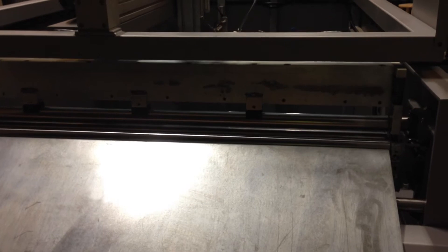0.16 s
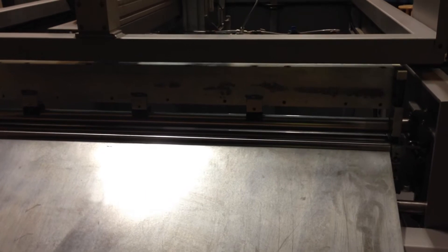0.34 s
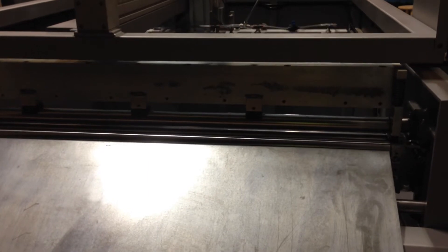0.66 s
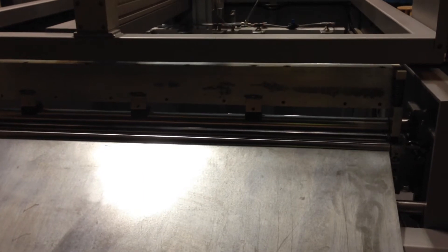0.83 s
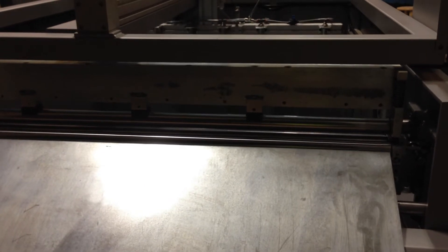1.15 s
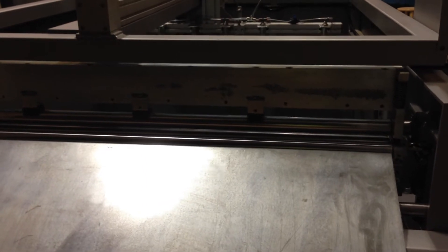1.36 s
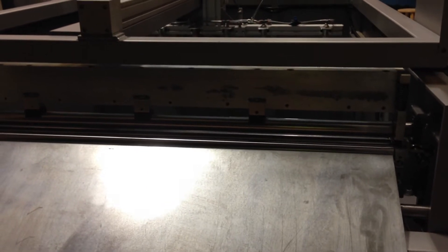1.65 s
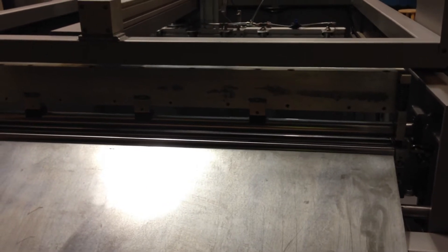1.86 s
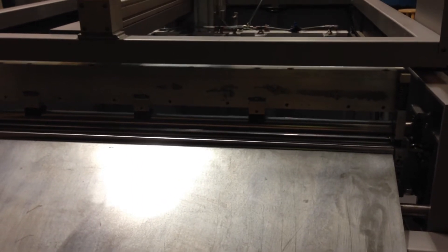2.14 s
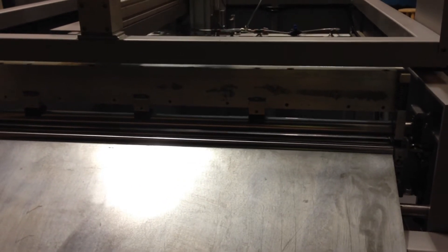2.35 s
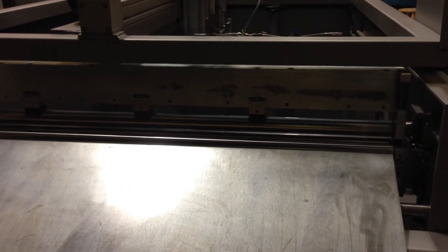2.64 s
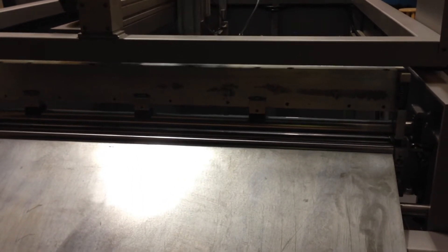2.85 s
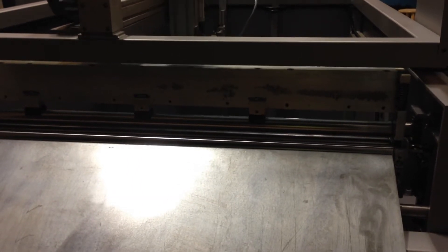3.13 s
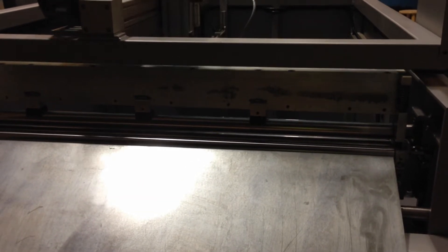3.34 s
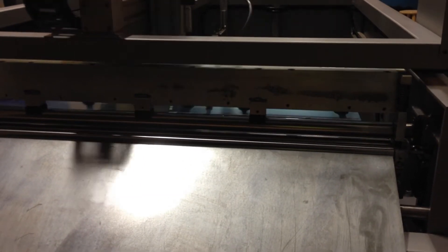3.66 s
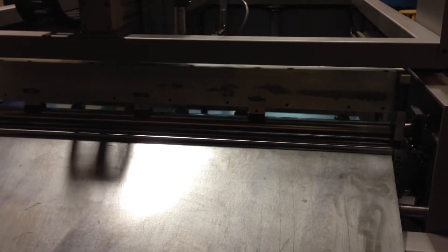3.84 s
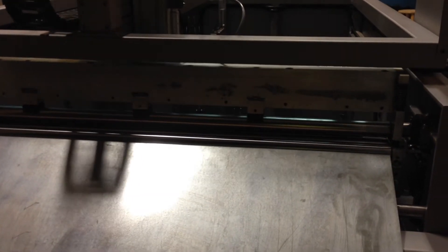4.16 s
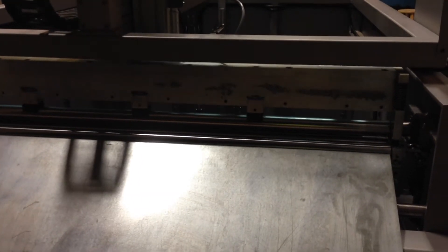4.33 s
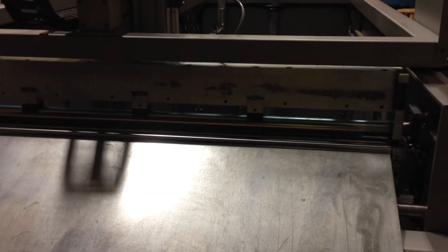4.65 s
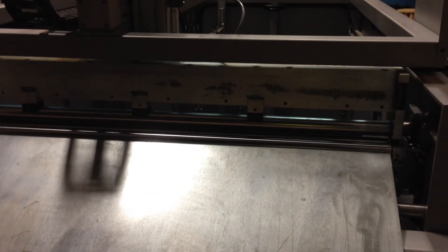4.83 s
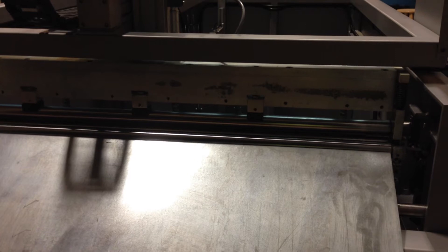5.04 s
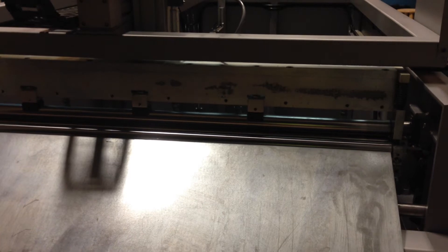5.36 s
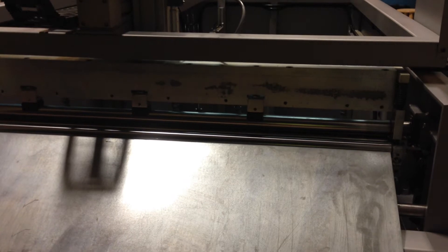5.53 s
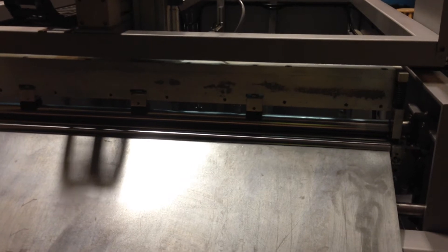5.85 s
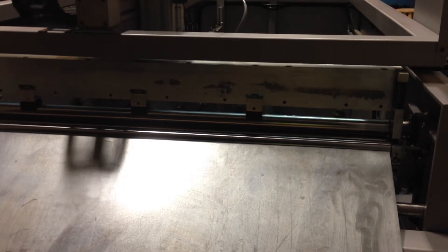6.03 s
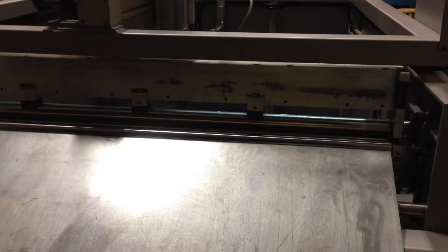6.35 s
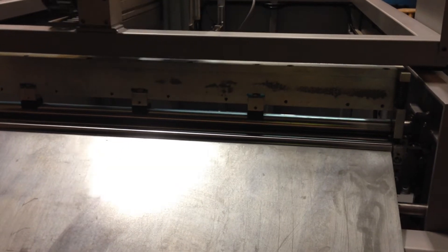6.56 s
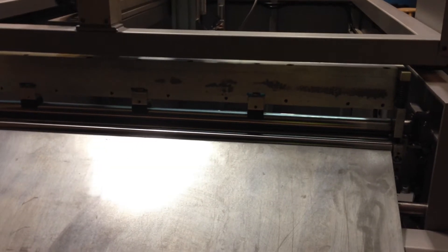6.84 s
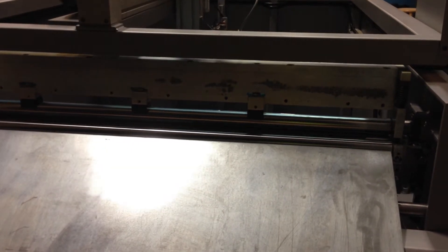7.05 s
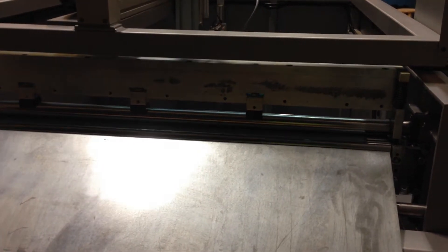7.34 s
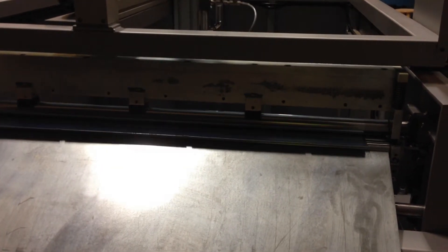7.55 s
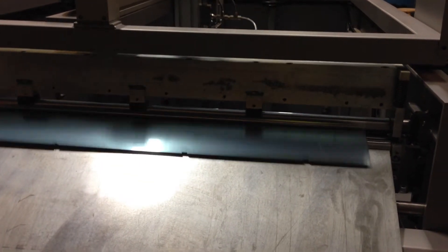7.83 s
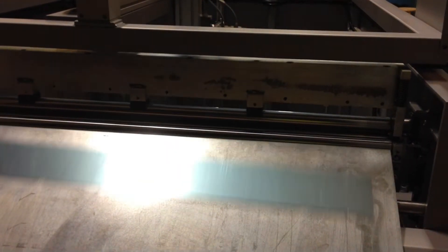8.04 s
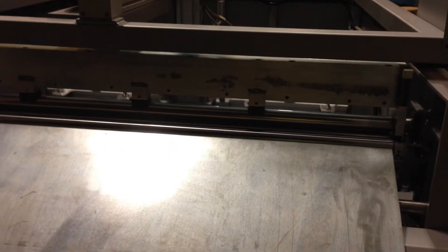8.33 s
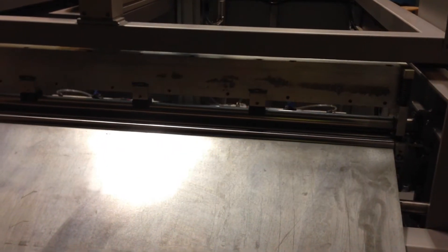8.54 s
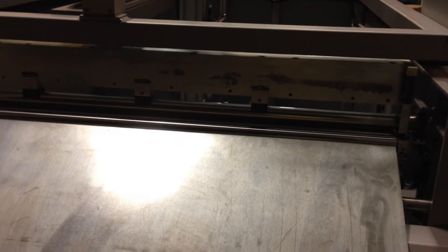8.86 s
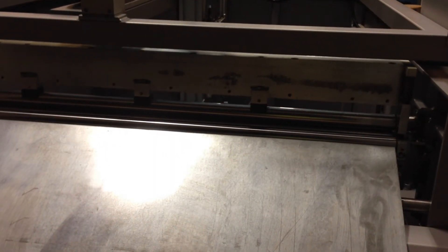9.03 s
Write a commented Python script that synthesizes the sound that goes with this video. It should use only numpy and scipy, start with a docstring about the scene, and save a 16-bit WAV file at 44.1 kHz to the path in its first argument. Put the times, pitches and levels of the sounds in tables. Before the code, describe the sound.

Steady airy suction hiss over low machinery rumble, with faint rhythmic chirps and soft groans as a carriage moves. After more than five seconds a loud half-second air blast bursts out with a harsh rubbery squeal, followed by steel clacks and quick weakening bounces. Rollers whir and scrape, leaking valves hiss with thin whistles, and a hard double clack rings. Fairly close microphone in an echoing factory hall.

```python
"""Factory hall with a pneumatic sheet loader. Suction cups hiss (shaped noise) while the carriage brings
a sheet in, chirping and groaning (narrow noise). An air blast (gated noise) frees the sheet and the rubber
lips squeal (jittered harmonics). The sheet drops, bounces and scrapes out over rollers; stops clack on the
steel frame (noise burst plus modes). Valves leak (noise plus wavering sines) over machinery rumble and hum.
The blasts and the impacts echo in the hall."""
import sys
import numpy as np
from scipy import signal
from scipy.fft import rfft, irfft, next_fast_len
from scipy.io import wavfile

SR = 44100
rng = np.random.default_rng(int(sys.argv[2]) if len(sys.argv) > 2 else 0)


def int16_out(signal):
    """Quantize to a 16-bit WAV file."""
    q = np.round(np.clip(np.atleast_2d(signal).T, -1, 1) * 32767)
    wavfile.write(sys.argv[1], SR, q.astype(np.int16))


N = 405279
T = np.arange(N) / SR

# air blasts: opens t/s, closes t/s, level/dB, sag/(dB/s), release/(dB/s)
BLASTS = [(5.453, 5.9, -19.2, 22, 100), (6.02, 6.204, -34.5, 20, 146)]
BLAST_ATTACK_S = 0.022
ROLL_FROM_S, ROLL_TO_S, SPIN_UP_S, COAST_S = 6.88, 7.86, .24, .6


def blow_off():
    """The valve dumps air through the cups: a jet that sags as the line empties, and beating lip squeals."""
    # jet spectrum: f/Hz, relative level per Hz/dB
    jet_colour = [(110, -30), (440, -17), (690, -8.5), (1040, 2.5), (1370, -12.5), (1960, 3.5),
                  (2720, -5.5), (3450, .5), (3950, -4.5), (4650, .5), (5300, -4.5), (8350, -3.5),
                  (12100, -7.5), (15400, -10.5)]
    # lip squeals: start t/s, end t/s, pitch f/Hz, initial sharpness/Hz, slack flattening/Hz, level/dB,
    # roughness 0-1, overtone gain/dB
    squeals = [(5.457, 5.75, 1180.5, 36, 0, -21.5, .38, 1.6), (5.462, 5.59, 1125, -55, 0, -25.5, .5, 2),
               (5.47, 5.785, 778, 28, 0, -24.5, .45, -17), (5.5, 5.64, 1068, 0, 0, -27, .6, -3),
               (5.53, 5.62, 998, -20, 0, -29.5, .8, -7), (5.63, 5.765, 985, 85, 0, -27, .8, -8),
               (5.745, 5.975, 1181, 14, 53, -26.5, .45, 0), (5.77, 5.895, 1131, 22, 75, -23.5, .55, 5),
               (5.865, 5.975, 779, 0, 0, -34, .35, -19)]
    flow = np.zeros(N)
    for opens, closes, db, sag, release in BLASTS:
        attack = np.clip((T - opens) / BLAST_ATTACK_S, 0, 1)
        sag_db = sag * np.clip(T - opens, 0, closes - opens)
        release_db = release * np.maximum(T - closes, 0)
        flow += attack * undb(db - sag_db - release_db)
    jet = panels(air(jet_colour), echo_db=-11, spread_s=.008)
    out = jet * flow * undb(0.43 * walk(140))
    for squeal in squeals:
        add(out, squeal[0], cup(*squeal))
    return out


def cup(start, end, pitch_hz, sharp_hz, flat_hz, db, rough, overtone_db):
    """A rubber lip flaps and settles on its pitch; its slap is rich in overtones while pressure is high."""
    # slap overtones: multiple of the pitch, relative level/dB
    lip_overtones = [(1, 0), (2, -3), (3, -9.5), (4, -10), (5, -17), (6, -21), (7, -20), (8, -20),
                     (10, -24), (13, -28)]
    # pressure collapse behind the lips; slap share left afterwards
    slack_s, slack_spread_s, slack_slap = 5.908, .014, .12
    attack_s, release_s, settle_s = .012, .022, .045
    jitter, flutter_db = .016, 5.3  # at full roughness
    t = T[:SR // 2]
    slack = .5 + .5 * np.tanh((start + t - slack_s) / (2 * slack_spread_s))
    hz = pitch_hz + sharp_hz * np.exp(-t / settle_s) - flat_hz * slack
    phase = turn(hz * (1 + jitter * rough * walk(700, t)))
    slap = 1 - (1 - slack_slap) * slack
    multiples, lip_db = np.transpose(lip_overtones)
    tone = np.sin(phase)
    for k in range(2, 13 + 1):
        partial_db = np.interp(k, multiples, lip_db) + overtone_db + 2.8 * walk(42, t)
        tone += slap * undb(partial_db) * np.sin(k * phase + rng.uniform(0, 2 * np.pi))
    level = undb(db + flutter_db * rough * walk(80.9, t))
    return np.sqrt(2) * tone * level * gate(0, end - start, attack_s, release_s, t)


def clacks(bounces=4):
    """Valves and stops strike the frame; the dropped sheet bounces, each time sooner and weaker."""
    # impacts: t/s, centre f/Hz, span/octaves, burst level over 10 ms/dB, t60/s, frame ring re burst/dB
    strikes = [(5.430, 7000, 1.2, -33.5, .012, -24), (5.4562, 860, 0.93, -24, 0.11, -9.5),
               (5.9734, 1950, 0.52, -22, .07, -18), (6.0255, 528, 1.6, -23.5, 0.65, -11),
               (6.0627, 2350, 1.6, -17, .09, -14), (7.084, 1260, 0.46, -34.5, 0.043, -14),
               (7.1, 2080, 1.4, -38.5, 0.11, -15), (7.2905, 3520, .38, -38, .028, -2),
               (7.4903, 940, 0.51, -37.5, .035, -13), (7.9419, 4700, .3, -22.5, .005, -9),
               (7.9422, 1100, 1.9, -27, .045, -5), (8.5604, 1690, 1.8, -32, .39, -15),
               (8.582, 1230, .15, -16.5, .04, -12), (8.5862, 2000, 1.5, -14.5, .06, -11),
               (8.5957, 2860, 1.3, -17.5, .045, -20), (8.636, 2870, 1.2, -30.5, .28, -18),
               (9.1171, 1670, .62, -36.5, 0.11, -13), (9.1425, 1390, .96, -31.5, 0.18, -12)]
    landing_s, gap_s, gap_shrink = 6.1052, .033, .82
    first_db, loss_db = -22.5, 3
    out = np.zeros(N)
    for s, hz, octaves, db, t60_s, ring_db in strikes:
        add(out, s, undb(db) * contact(hz, octaves, t60_s, ring_db))
    for k in range(bounces):
        bounce = contact(hz=950, octaves=0.9, t60_s=0.16, ring_db=-12)
        add(out, landing_s, undb(first_db - loss_db * k) * bounce)
        landing_s += gap_s * gap_shrink ** k
    # thin steel parts radiate little bass
    return signal.sosfilt(signal.butter(3, 125, "high", fs=SR, output="sos"), out)


def contact(hz, octaves, t60_s, ring_db):
    """A burst of dense, quickly damped modes, plus the ring of the frame."""
    # nominal modes of the steel frame: f/Hz, relative level/dB, t60/s
    frame_modes = [(205, -7, .17), (525, -4, .06), (610, 1, .07), (735, -3, .16), (935, -7, .07),
                   (1215, 0, .055), (1455, -2.5, .05), (2410, -5, .06), (2795, -6, .14), (3720, -10, .07),
                   (8320, -13, .11)]
    t = T[:SR // 2]
    f = np.fft.rfftfreq(len(t), 1 / SR) + 1
    colour = 1 / (1 + (np.log2(f / hz) / octaves) ** 2)
    noise = irfft(rfft(rng.standard_normal(len(t))) * colour, len(t))
    burst = unit(noise * undb(-60 * t / t60_s))
    ring = np.zeros(len(t))
    for mode_hz, mode_db, mode_t60_s in frame_modes:
        a, b = rng.standard_normal(2)  # each strike varies the mode's level, pitch and sign
        envelope = undb(mode_db + 2 * a - 60 * t / mode_t60_s)
        ring += envelope * np.sign(b) * np.sin(2 * np.pi * mode_hz * (1 + 0.0098 * b) * t)
    # burst energy equals 10 ms at rms 1
    return (burst + undb(ring_db) * unit(ring)) * np.sqrt(.01 / t[-1])


def slide():
    """The sheet scrapes over the rollers, higher and louder with speed; it rings when landing or gripped."""
    # sheet rings: t/s, f/Hz, width/Hz, initial level/dB, t60/s
    sheet_rings = [(6.064, 195, 25, -38.5, 0.56), (7.084, 987, 90.1, -34.5, 0.36),
                   (7.945, 749, 22, -39, .55)]
    rest_hz, rise_hz = 643, 330
    scrape_db, slip_db = -50.5, 9  # slip: extra level while the rollers speed up
    speed = roller_speed()
    hz = rest_hz + rise_hz * speed
    scrape = narrow(hz, width_hz=60) + undb(2.5) * narrow(hz, width_hz=260)
    slipping = gate(ROLL_FROM_S, ROLL_FROM_S + SPIN_UP_S, .03, .05)
    out = unit(scrape) * speed ** 2 * undb(scrape_db + slip_db * slipping + 0.96 * walk(50))
    for s, ring_hz, width_hz, db, t60_s in sheet_rings:
        decay = undb(db - 60 * np.maximum(T - s, 0) / t60_s)
        out += np.clip((T - s) / .006, 0, 1) * decay * narrow(ring_hz, width_hz)
    return out


def roller_speed():
    """Speed of the rollers, 0-1: spin up, run, coast down."""
    return gate(ROLL_FROM_S, ROLL_TO_S, SPIN_UP_S, COAST_S)


def suction():
    """Air rushes into the open cups until the blow-off; the hiss changes colour and grows near the bed."""
    # hiss spectrum far from the bed: f/Hz, relative level per Hz/dB
    far_colour = [(400, -7.5), (1100, -14), (1900, 0.5), (2300, 0.5), (2900, 4), (3300, 3.5), (3800, -2.5),
                  (4500, 0), (5600, -3), (8000, 1.5), (9500, -5.5), (12000, -7), (13400, -9),
                  (15400, -14.5)]
    # hiss spectrum close to the bed: f/Hz, relative level per Hz/dB
    near_colour = [(400, -16), (1200, -19.5), (1850, -6), (2400, -10.5), (3000, -4.5), (3350, -2),
                   (3900, -12), (4800, -4), (5700, -7.5), (7300, -9.5), (9000, -14), (10200, -13),
                   (13400, -20), (15400, -19.5)]
    lower_from_s, lower_to_s, raised_nearness = 2.34, 4.55, .07
    raised_db, bed_gain_db = -42.5, 4  # level at nearness 0; gain at nearness 1
    near = np.interp(T, [lower_from_s, lower_to_s], [raised_nearness, 1])
    hiss = np.sqrt(1 - near) * air(far_colour) + np.sqrt(near) * air(near_colour)
    hiss = panels(hiss, echo_db=-16, spread_s=.012)
    hiss *= undb(raised_db + bed_gain_db * near + 0.47 * walk(14))
    return hiss * (T < BLASTS[0][0] + BLAST_ATTACK_S)


def leaks():
    """Leaking valves hiss, dull if weak and bright if strong; pairs of thin edge tones waver in it."""
    # leaks: opens t/s, closes t/s, level/dB, brightness 0-1
    valves = [(5.998, 9.3, -57, .03), (7.06, 7.95, -50, .35), (7.29, 7.95, -44, .95),
              (7.29, 8.575, -45.5, .85), (8.57, 9.3, -51.5, .12)]
    # edge tones: start t/s, end t/s, f/Hz, partner f/Hz, pitch waver of the first/Hz, its level/dB
    edge_tones = [(.12, 4.0, 12140, 11860, 45, -58.5), (6.15, 7.25, 7030, 7320, 18, -60),
                  (6.15, 7.2, 4818, 5900, 18, -67), (6.15, 7.3, 12145, 11983, 45, -59),
                  (6.9, 7.1, 4400, 6700, 55, -58), (7.08, 7.95, 6799, 7004, 13, -50),
                  (7.2, 7.95, 7407, 12075, 20, -55), (7.3, 8.56, 11924, 12075, 6, -46),
                  (8.55, 9.3, 11950, 12140, 80, -60)]
    # weak leak spectrum: f/Hz, relative level per Hz/dB
    weak_colour = [(500, -29), (1200, -40), (1600, -2), (2700, 5), (3600, 5), (5500, 5), (7200, 0.5),
                   (8000, -4.5), (10500, -8.5), (12000, -7), (13500, -12), (15500, -24)]
    # strong leak spectrum: f/Hz, relative level per Hz/dB
    strong_colour = [(500, -21), (1400, 0), (2000, 4.5), (2900, 7.5), (3900, 0.5), (5000, 2.5), (7200, 1.5),
                     (9000, 0.5), (12000, -4), (15500, -7)]
    open_s, close_s, fade_s, partner_db = 0.037, .08, .07, -7.5
    weak_power, strong_power, tones = np.zeros(N), np.zeros(N), np.zeros(N)
    for opens, closes, db, bright in valves:
        power = (gate(opens, closes, open_s, close_s) * undb(db)) ** 2
        weak_power += (1 - bright) * power
        strong_power += bright * power
    for start, end, hz, partner_hz, waver_hz, db in edge_tones:
        pair = whistle(hz, waver_hz) + undb(partner_db) * whistle(partner_hz, waver_hz=25)
        tones += gate(start, end, fade_s, fade_s) * undb(db) * pair
    dull = panels(air(weak_colour), echo_db=-8, spread_s=0.014)
    sharp = panels(air(strong_colour), echo_db=-8, spread_s=0.014)
    hiss = np.sqrt(weak_power) * dull + np.sqrt(strong_power) * sharp
    return hiss * undb(0.29 * walk(45)) + tones


def whistle(hz, waver_hz):
    """An edge tone of rms near 1 that wavers in pitch and level."""
    return np.sqrt(2) * undb(0.99 * walk(24)) * np.sin(turn(hz + waver_hz * walk(210)))


def chirps(count=5):
    """The running carriage gives a fluttering chirp on every turn as it runs in."""
    first_s, every_s, length_s = .1, .395, .32
    age = T - first_s
    swell = np.sin(np.pi * np.clip(age % every_s / length_s, 0, 1))
    running = (age > 0) * (age < count * every_s)
    return undb(-50.5) * swell * running * narrow(4480, width_hz=50)


def machinery():
    """Rumble and motor hum; the rumble swells as carriage or rollers move, and each stroke groans."""
    # carriage strokes: start t/s, end t/s, first f/Hz, last f/Hz, peak groan level/dB, peak rumble level/dB
    strokes = [(.82, 1.111, 474, 260, -48.5, -52), (1.76, 1.97, 151.7, 197, -54, -59),
               (4.74, 4.956, 133.7, 146, -53.5, -51), (4.82, 5.343, 297, 377, -52.5, -52),
               (4.854, 5.297, 607, 638, -51, -54), (6.49, 6.69, 255, 350, -46, -53),
               (8.878, 8.947, 207, 183, -53, -71)]
    # rumble spectrum: f/Hz, relative level per Hz/dB
    rumble_colour = [(28, -23), (56, -26), (76, -14), (97, -17), (124, -4.5), (185, 3.5), (285, 3),
                     (410, -3.5), (560, -2), (1010, -5), (1650, -6.5)]
    idle_db, travel_db, roller_db = -57.5, -55.5, -47  # powers add
    travel_from_s, travel_to_s, travel_ramp_s = 0.069, 4.24, 0.41
    travel = gate(travel_from_s, travel_to_s, travel_ramp_s, travel_ramp_s)
    power = undb(idle_db) ** 2 + (undb(travel_db) * travel) ** 2
    power += (undb(roller_db) * roller_speed() ** 2) ** 2
    out = undb(-71.5 + 2.6 * walk(2.8)) * np.sin(2 * np.pi * 120 * T)  # motor hum
    for start, end, first_hz, last_hz, groan_db, rumble_db in strokes:
        progress = np.clip((T - start) / (end - start), 0, 1)
        effort = np.sin(np.pi * progress)
        hz = first_hz + (last_hz - first_hz) * progress
        out += undb(groan_db) * effort * narrow(hz, width_hz=first_hz / 5)
        power += (undb(rumble_db) * effort) ** 2
    return out + air(rumble_colour) * np.sqrt(power) * undb(0.39 * walk(17))


def hall(x):
    """Diffuse echo of the hall: decaying noise whose treble dies first."""
    t60_s, treble_t60_s, echo_db = 1.1, .55, -17.5
    t = T[:SR]
    noise = rng.standard_normal(len(t))
    mids = signal.sosfilt(signal.butter(2, [520, 5000], "band", fs=SR, output="sos"), noise)
    tail = mids * undb(-60 * t / t60_s) + undb(-33) * noise * undb(-60 * t / treble_t60_s)
    tail *= np.clip(t / 0.0085, 0, 1)
    tail /= np.sqrt(np.sum(tail ** 2))
    return undb(echo_db) * signal.fftconvolve(x, tail)[:N]


def panels(x, echo_db, spread_s, count=12):
    """Early echoes from the steel panels comb a hiss into fine peaks; result at rms 1."""
    out = x.copy()
    for place, size in rng.uniform(-1, 1, (count, 2)):
        lag = 1 + int(abs(place) * spread_s * SR)
        out[lag:] += undb(echo_db) * size * x[:-lag]
    return unit(out)


def air(colour):
    """Turbulence: noise of rms 1 with a spectrum of (f/Hz, level/dB) points, falling beyond both ends."""
    hz, db = np.transpose(colour)
    size = next_fast_len(N)
    f = np.fft.rfftfreq(size, 1 / SR) + 1
    skirts = np.minimum(1, np.minimum(f / hz[0], hz[-1] / f)) ** 2
    gain = undb(np.interp(np.log(f), np.log(hz), db)) * skirts
    return unit(irfft(rfft(rng.standard_normal(size)) * gain, size)[:N])


def narrow(hz, width_hz):
    """Noise in one resonance, whose centre may move."""
    phase = turn(hz + np.zeros(N))
    return walk(2 * width_hz) * np.cos(phase) + walk(2 * width_hz) * np.sin(phase)


def walk(rate_hz, t=T):
    """Smooth random signal of spread near 1 that takes rate_hz new values a second."""
    steps = rng.standard_normal(len(t) // 16)
    place = t * rate_hz
    k = place.astype(int)
    blend = np.sin((place - k) * np.pi / 2) ** 2
    return steps[k] * (1 - blend) + steps[k + 1] * blend


def turn(hz):
    """Phase in radians of a moving frequency."""
    return 2 * np.pi * np.cumsum(hz) / SR


def gate(start, end, attack_s, release_s, t=T):
    """Rises from start, holds at 1 until end, then falls."""
    return np.clip(np.minimum((t - start) / attack_s, 1 - (t - end) / release_s), 0, 1)


def add(out, s, x):
    """Mix a short sound into out at time s."""
    start = int(s * SR)
    out[start:start + len(x)] += x[:N - start]


def undb(db):
    """Decibels to gain."""
    return 10 ** (np.asarray(db) / 20)


def unit(x):
    """Scale to rms 1."""
    return x / np.sqrt(np.mean(x ** 2))


def scene():
    """The loud events wake the hall; the steady sounds lie beneath them."""
    blast = blow_off()
    knocks = clacks() + slide()
    echo = hall(undb(4) * blast + undb(-3) * knocks)
    steady = suction() + leaks() + chirps() + machinery()
    return (blast + knocks + echo + steady)[None]


def record(dry):
    """The microphone cuts the top, above 15.4 kHz."""
    return signal.sosfilt(signal.ellip(10, .2, 70, 15400, fs=SR, output="sos"), dry)


dry = scene()
out = record(dry)
int16_out(out)
```